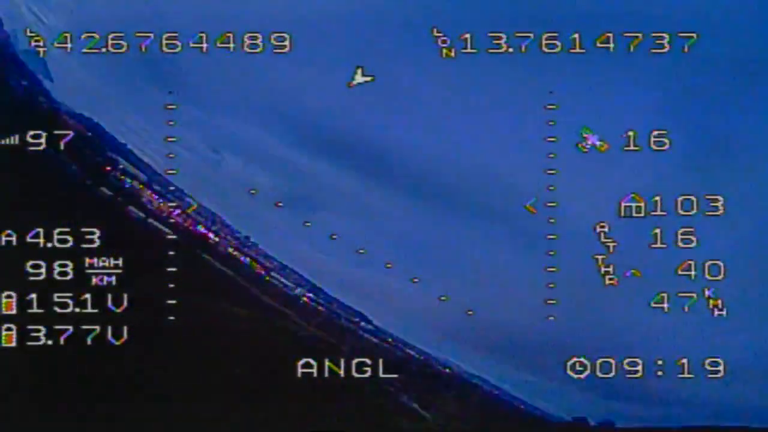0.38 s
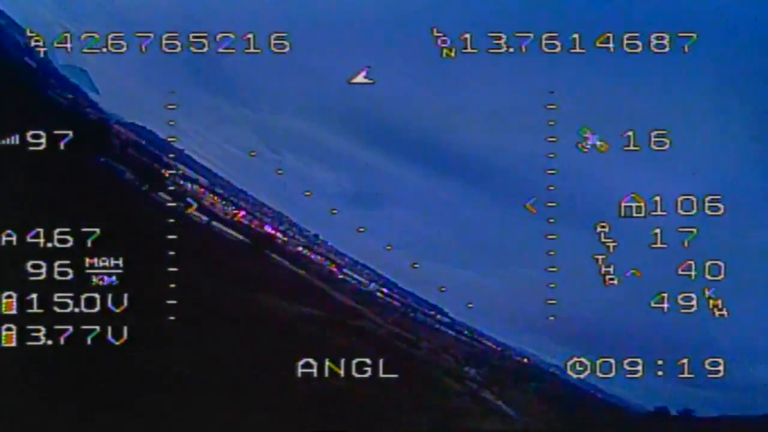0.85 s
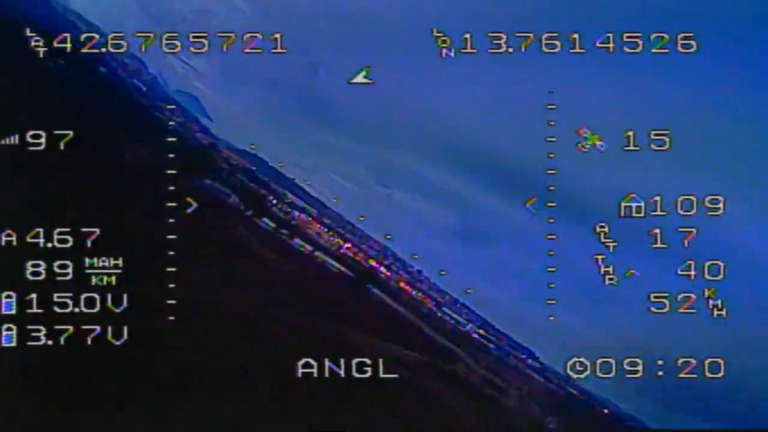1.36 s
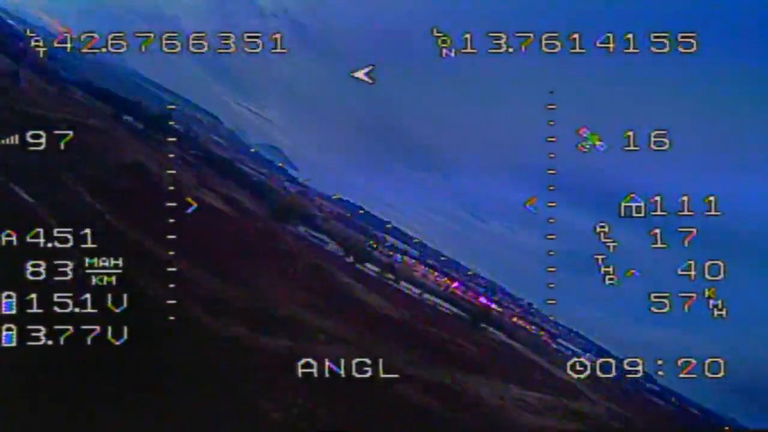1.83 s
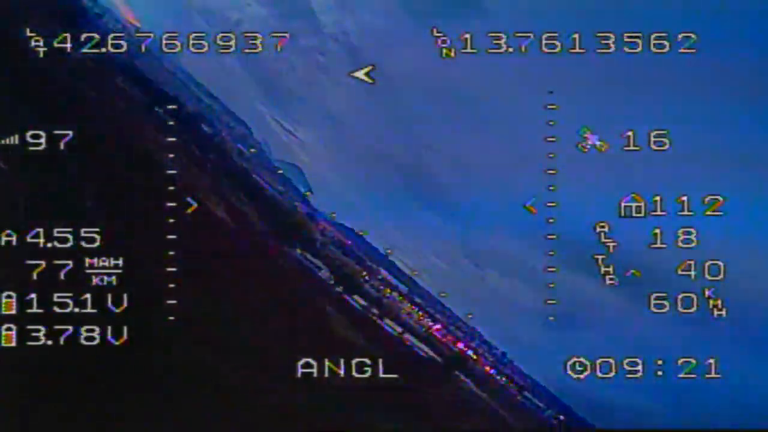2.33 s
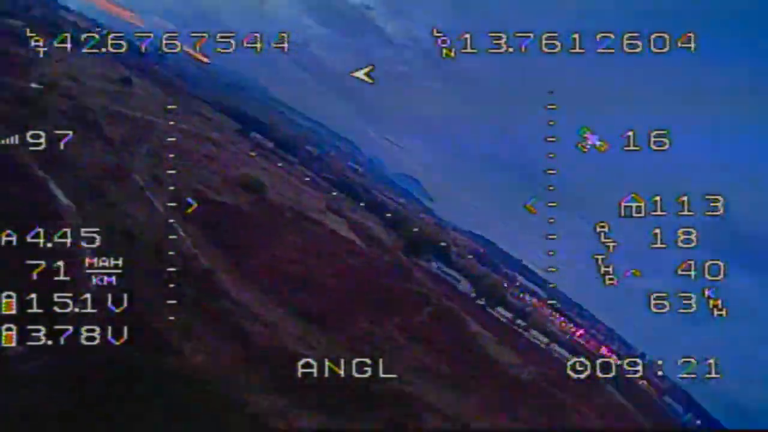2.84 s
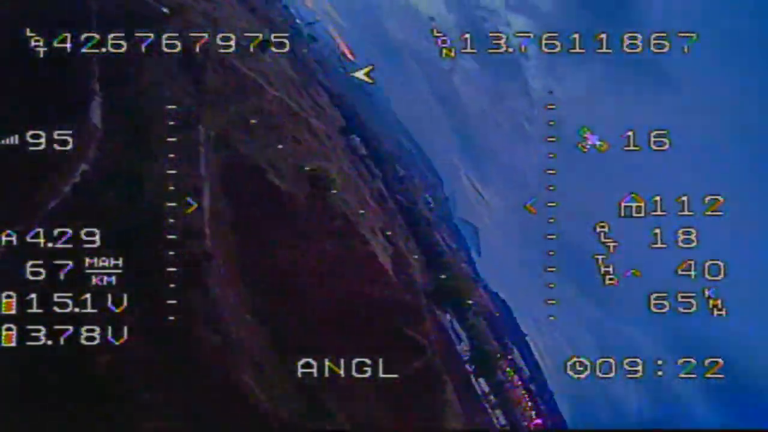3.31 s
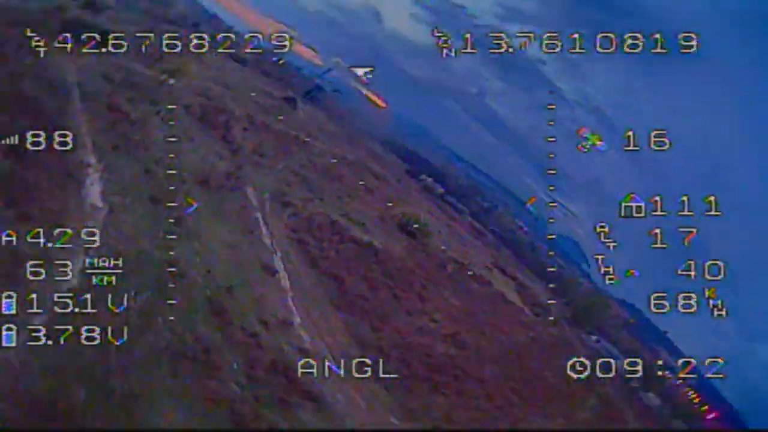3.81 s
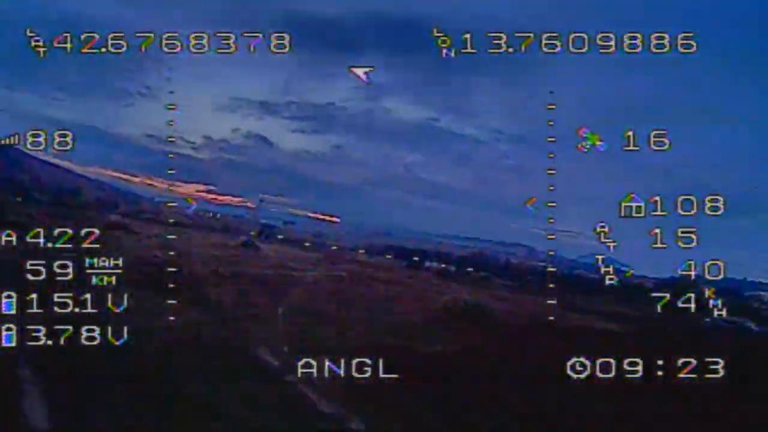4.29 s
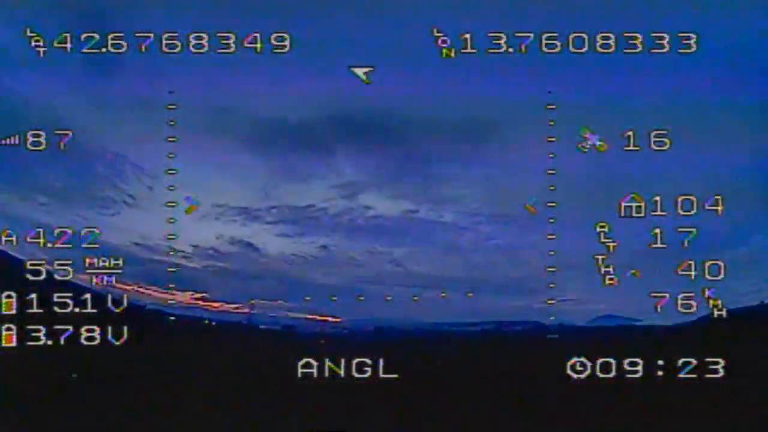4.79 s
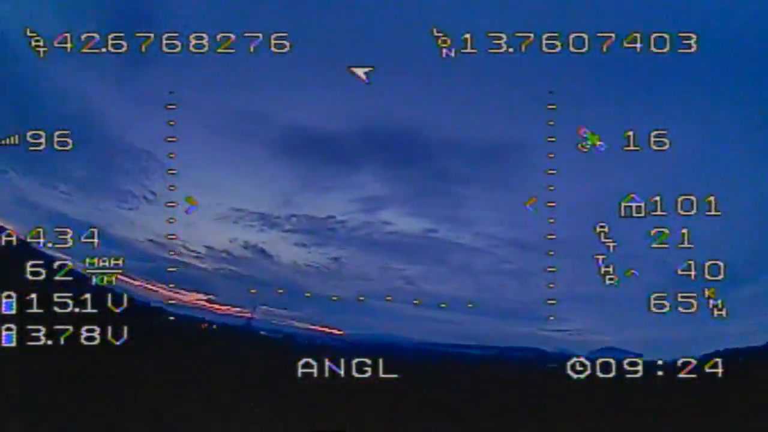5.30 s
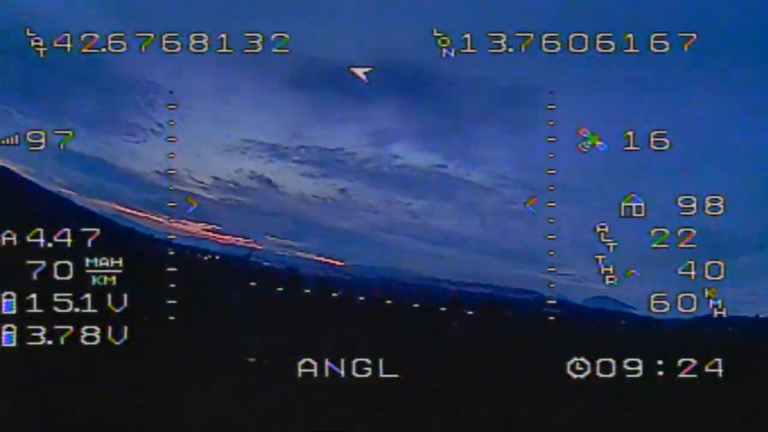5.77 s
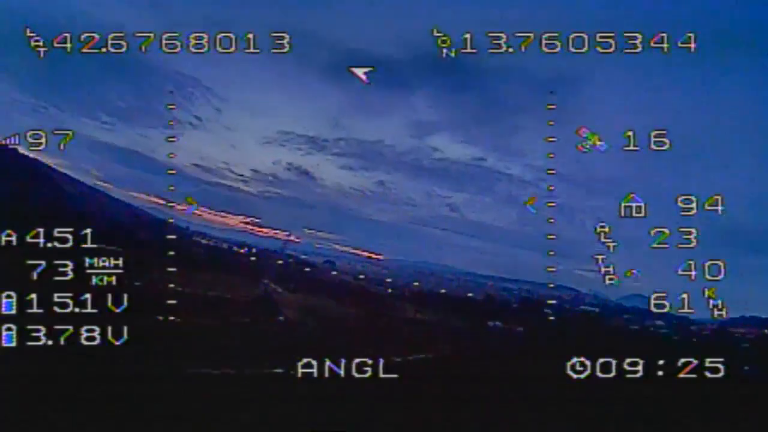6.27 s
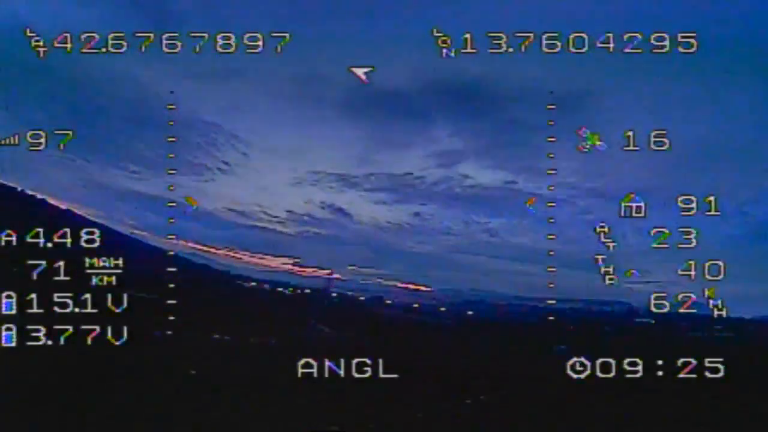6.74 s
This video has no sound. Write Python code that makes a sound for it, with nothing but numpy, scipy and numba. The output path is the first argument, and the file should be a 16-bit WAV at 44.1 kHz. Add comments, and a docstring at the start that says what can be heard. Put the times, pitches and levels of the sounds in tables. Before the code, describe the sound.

Onboard a little electric flying wing, a buzzing motor hum rises slightly and eases back amid roaring air, thin whistles and overloaded wind thumps.

```python
"""On board a small electric flying wing

A two-blade propeller hums on its shaft orders close to the microphone. Noise in overlapping ranges makes
the airstream, swelling in rough air; narrow resonances whistle, and pressure bumps overdrive the microphone.
A radio link rings near 20 Hz, hisses, crackles when reception breaks, cuts the top at 4 kHz and clips."""
import sys
import numpy as np
from scipy import signal
from scipy.fft import rfft, irfft
from scipy.io import wavfile
from scipy.ndimage import uniform_filter1d
from numba import njit

SR = 44100
rng = np.random.default_rng(int(sys.argv[2]) if len(sys.argv) > 2 else 0)


def dump(signal):
    """Clip the signal to [-1, 1] and save it as 16-bit WAV at the path in sys.argv[1]."""
    limited = np.clip(np.atleast_2d(signal).T, -1, 1)
    pcm = np.round(limited * 32767).astype(np.int16)
    wavfile.write(sys.argv[1], SR, pcm)


def level_to_linear(level):
    """Convert decibel levels to linear amplitude factors, elementwise."""
    exponent = np.asarray(level, float) / 20
    return 10 ** exponent


N = 303408  # samples
CRUISE_HZ = 168  # shaft speed that the airspeed is counted from
LINK_RING_HZ = 19.7

# Shaft speed, rising as the wing dives and the propeller unloads: (time [s], shaft speed [Hz])
SHAFT_SPEED = [(0.0, 168.2), (0.3, 167.9), (1.2, 168.2), (1.8, 170.2), (2.1, 170.2), (2.4, 171.7),
               (2.7, 171.9), (3.3, 173.5), (3.6, 173.7), (3.9, 175.5), (4.2, 175.8), (4.5, 175.5),
               (4.8, 174.1), (5.4, 170.6), (6.0, 169.6), (6.6, 169.8), (6.88, 169.5)]


def columns(table):
    """Curve columns, after the time column, as values per sample."""
    s, *cols = np.transpose(table)
    t = np.arange(N) / SR
    return [np.interp(t, s, c) for c in cols]


def unit(x):
    """Scale to rms 1."""
    return x / np.sqrt(np.mean(x ** 2))


def walk(rate):
    """Random levels held 1 / rate s and smoothed twice over that time; rms about 1."""
    hold = int(SR / rate)
    steps = np.repeat(rng.standard_normal(N // hold + 1), hold)
    slewed = uniform_filter1d(uniform_filter1d(steps, hold), hold)
    return unit(slewed)[:N]


def bump(t, middle, length):
    """Smooth rise and fall from 0 to 1 and back."""
    return np.cos(np.pi * np.clip((t - middle) / length, -.5, .5)) ** 2


@njit
def svf(x, hz, width):
    """State-variable filter with a moving centre; rows: band (gain 1), high."""
    y, b, l = np.empty((2, len(x))), 0., 0.
    for i in range(len(x)):
        g, k = np.tan(np.pi * hz[i] / SR), width / hz[i]
        v = (b + g * (x[i] - l)) / (1 + g * (g + k))
        low = l + g * v
        b, l = 2 * v - b, 2 * low - l
        y[0, i], y[1, i] = k * v, x[i] - k * v - low
    return y


def extra_speed():
    """Shaft speed above cruise in Hz: the measure of airspeed."""
    return columns(SHAFT_SPEED)[0] - CRUISE_HZ


def propeller():
    """Tones on the shaft orders; turbulence at the blades makes each flutter in size and timing."""
    # Main tones: (time [s], 2nd order level [dB], 4th order level [dB], 6th order level [dB])
    main_tones = [(0, -26, -24.5, -27), (.6, -22.5, -23.5, -27), (.85, -25.5, -17.5, -28),
                  (1.3, -21.5, -23, -25.5), (1.53, -22.5, -17.5, -29), (1.7, -27, -21.5, -26.5),
                  (2.1, -26, -17.5, -28), (2.5, -25, -25, -29.5), (2.9, -24, -22, -35.5),
                  (3.7, -26, -26.5, -30.5), (3.91, -22.5, -28, -22), (4.1, -22.5, -27.5, -35.5),
                  (4.65, -21.5, -25.5, -35.5), (4.95, -26.5, -24, -39), (5.1, -21.5, -18.5, -25),
                  (5.7, -31, -23, -27.5), (6.0, -26, -19.5, -27), (6.46, -24, -18, -25),
                  (6.88, -26.5, -18.5, -27.5)]
    # Higher orders: (multiple of the shaft rate, level at cruise [dB],
    # slope [dB per Hz of extra shaft speed], share of the 6th order's swings)
    upper_orders = [(8, -33, -.5, .5), (10, -35.5, -1.26, .7), (12, -37, -1.2, .3), (14, -40.5, 0, .3),
                    (16, -47, 0.4, .2), (18, -53.5, -2.3, .2), (20, -50, -0.6, .2), (21, -45.5, -0.67, .2)]
    turn = 2 * np.pi * np.cumsum(columns(SHAFT_SPEED)[0]) / SR
    second, fourth, sixth = columns(main_tones)
    shaft_tone_db = -28.5 + 1.1 * walk(6)
    orders = [(1, shaft_tone_db), (2, second), (4, fourth), (6, sixth)]
    sixth_swing = sixth - sixth.mean()
    for order, cruise_db, slope, share in upper_orders:
        db = cruise_db + slope * extra_speed() + share * sixth_swing + 1.2 * walk(5)
        orders.append((round(order), db))
    out = 0
    for order, db in orders:
        jitter = (0.087 + .03 * order) * walk(30)  # radians
        phase = order * turn + 2 * np.pi * rng.random() + jitter
        out = out + np.sqrt(2) * level_to_linear(db + 1.2 * walk(25)) * np.sin(phase)
    return out


def airstream():
    """Coloured turbulence in overlapping ranges that follow airspeed, each swelling and flickering a little."""
    # Relative colour of the air noise: (frequency [Hz], spectral density [dB])
    air_colour = [(21, -29.5), (35, -5.5), (101, -7), (170, -6.5), (225, -5.5), (342, -4), (386, -5),
                  (553, -5), (689, -6.5), (809, -6.5), (1010, -8), (3480, -17.5), (4170, -40),
                  (5420, -57.5), (9170, -120)]
    # Middles of the overlapping ranges, lowest first: (frequency [Hz], ..)
    centres_hz = (70, 300, 900, 1900, 3300)
    # The same ranges: (level at cruise [dB], slope [dB per Hz of extra shaft speed], slow swell [dB])
    air_ranges = [(-30, 0.68, 2), (-26.5, 0.57, 1.5), (-24.5, 0.34, 1.2), (-32, 1.09, 0), (-36.5, 0.71, .5)]
    octave = np.log2(np.maximum(np.arange(N // 2 + 1) * SR / N, 1))
    hz, db = np.transpose(air_colour)
    colour = level_to_linear(np.interp(octave, np.log2(hz), db))
    out = 0
    for share, (cruise_db, slope, swell_db) in zip(np.eye(len(centres_hz)), air_ranges):
        # each range fades into its neighbours so that their powers add up
        shape = colour * np.sqrt(np.interp(octave, np.log2(centres_hz), share))
        level_db = cruise_db + slope * extra_speed() + swell_db * walk(4)
        flicker_db = 1.2 * walk(12)
        noise = unit(irfft(rfft(rng.standard_normal(N)) * shape, N))
        out = out + level_to_linear(level_db + flicker_db) * noise
    return out


def whistle(table, width):
    """Noise through two equal narrow resonances whose pitch and level follow a table."""
    hz, db = columns(table)
    once = svf(rng.standard_normal(N), hz, width)[0]
    return unit(svf(once, hz, width)[0]) * level_to_linear(db)


def whistles():
    """Edge tones of air over an opening, wandering with airspeed and angle."""
    # Middle edge tone: (time [s], pitch [Hz], level [dB])
    middle = [(0, 1243, -27), (.45, 1280, -29.5), (.8, 1283, -31), (1.3, 1312, -27), (1.62, 1442, -28.5),
              (1.72, 1307, -37), (1.82, 1136, -21.5), (1.95, 1200, -27.5), (2.3, 1212, -27),
              (2.5, 1254, -52.5), (2.78, 1273, -21), (2.97, 1335, -24), (3.15, 1465, -41.5),
              (3.8, 1433, -36), (3.95, 1455, -25), (4.55, 1438, -27), (4.95, 1378, -23), (5.4, 1205, -31),
              (5.6, 1228, -45), (6.15, 1418, -47), (6.3, 1478, -28), (6.88, 1457, -28)]
    # Lower edge tone: (time [s], pitch [Hz], level [dB])
    lower = [(0, 596, -27.5), (.4, 615, -28.5), (.9, 610, -30), (1.45, 636, -31), (1.65, 633, -47.5),
             (3.9, 961, -40), (4.15, 985, -27.5), (4.8, 888, -28.5), (5.0, 870, -41), (6.15, 1123, -43),
             (6.3, 1105, -26.5), (6.88, 1119, -28)]
    # Higher edge tone: (time [s], pitch [Hz], level [dB])
    higher = [(2.7, 1595, -57.5), (2.85, 1647, -33), (3.02, 1827, -29), (3.12, 1820, -51),
              (3.75, 1755, -44.5), (3.9, 1770, -27), (4.3, 2057, -32), (4.75, 1875, -38), (5.05, 1726, -24),
              (5.2, 1672, -52.5)]
    return whistle(middle, 85.) + whistle(lower, 65.) + whistle(higher, 140.)  # widths in Hz


def port_hiss():
    """Air over the microphone port rings in a steady high band, its level following airspeed."""
    centre_hz, width_hz, cruise_db = 3660., 380, -42
    ringing = svf(rng.standard_normal(N), np.full(N, centre_hz), width_hz)[0]
    return unit(ringing) * level_to_linear(cruise_db + 0.22 * extra_speed())


def sway():
    """Slow pressure swings as the wing rocks in rough air, now and then in stronger bouts."""
    # Harder rocking, centred a quarter length before the time at which its
    # sine crosses zero: (zero crossing [s], whole length [s], peak level [dB])
    rocking = [(.43, .35, -30), (1.29, .2, -33), (1.84, .15, -28), (2.185, .15, -25.5), (2.395, .15, -29),
               (2.962, .26, -23.5), (3.495, .2, -28), (3.805, .25, -29), (4.28, .2, -29), (5.919, .25, -30),
               (6.57, .15, -32)]
    t = np.arange(N) / SR
    hz, width_hz, sway_db = np.full(N, 20.), 9.9, -39.5
    once = svf(rng.standard_normal(N), hz, width_hz)[0]
    out = unit(svf(once, hz, width_hz)[0]) * level_to_linear(sway_db)
    for s, length, db in rocking:
        swing = np.sin(2 * np.pi * LINK_RING_HZ * (t - s))
        out = out + level_to_linear(db) * bump(t, s - length / 4, length) * swing
    return out


def rough_air():
    """Bursts of turbulence, each a swell of noise in its own range."""
    # Bursts, level before the treble is smoothed:
    # (middle [s], length [s], centre [Hz], width [Hz], level [dB])
    bursts = [(1.722, 0.27, 495, 900, -19), (2.28, 0.26, 594, 900, -18), (2.535, 0.43, 203, 220, -14),
              (2.948, .4, 806, 1200, -22.5), (3.198, 0.56, 303, 400, -22), (3.52, 0.17, 702, 900, -19),
              (3.76, 0.23, 512, 900, -20), (4.3, .5, 90, 100, -25.5), (4.65, .35, 500, 700, -22.5),
              (5.304, 0.53, 510, 600, -16.5), (5.748, 0.25, 200, 400, -9), (6.0, 0.83, 349, 400, -20),
              (6.88, 0.16, 69.7, 80, -23)]
    out, t = 0, np.arange(N) / SR
    for s, length, hz, width, db in bursts:
        noise = unit(svf(rng.standard_normal(N), np.full(N, 1. * hz), 1. * width)[0])
        smoothed = uniform_filter1d(noise, size=int(SR / hz / 5))  # a fifth of a period
        out = out + level_to_linear(db) * bump(t, s, length) * smoothed
    return out


def reception_breaks():
    """The receiver output jumps while the carrier is lost, then swings back and settles."""
    # Breaks, sizes ahead of the top cut and the rails:
    # (start [s], length [s], jump [amplitude], swing back [amplitude])
    breaks = [(3.5788, 0.0032, 1.3, -0.6), (3.5826, 0.0005, 2.2, -0.4), (3.6101, 0.0013, 1.1, -0.3),
              (3.6128, 0.0013, 1.5, -0.7), (3.7072, .0007, -1.0, .05), (4.8262, 0.0028, 1.1, .05),
              (5.8222, .0004, .4, 0)]
    settle_s = 0.0059
    t, out = np.arange(N) / SR, np.zeros(N)
    for s, length, jump, back in breaks:
        after = t - s - length
        out += jump * ((t >= s) & (after < 0))
        out += back * (after >= 0) * np.exp(-np.maximum(after, 0) / settle_s)
    return out


def gusts():
    """Smooth pressure bumps on the membrane, strong enough to overdrive the microphone."""
    # Gusts: (middle [s], length [s], push ahead of the overdrive [amplitude, sign = direction])
    pushes = [(5.690, 0.018, 0.3), (5.743, 0.012, -0.4), (5.767, 0.012, -.5), (5.810, 0.03, -.65)]
    t = np.arange(N) / SR
    return sum(push * bump(t, s, length) for s, length, push in pushes)


def scene():
    """Everything that presses on the microphone; source levels are those ahead of its overdrive."""
    air = airstream() + rough_air() + port_hiss() + sway() + whistles() + gusts()
    return (propeller() + air)[None]


def low_pass(x):
    """Removes everything above the highest recorded frequency."""
    return signal.sosfilt(signal.butter(12, 15800, fs=SR, output="sos"), x)


def record(dry):
    """Overdriven microphone, ringing bass coupling, radio link, steep top cut, hard rails."""
    ring_width_hz, hiss_db, top_hz = 3., -29.5, 4100  # hiss level ahead of the top cut
    offset, rail = 0.013, .705
    mic = 0.4 * np.tanh(4.13 * dry[0])
    coupled = svf(mic, np.full(N, LINK_RING_HZ), ring_width_hz)[1]  # high-pass that rings at its corner
    hiss = level_to_linear(hiss_db) * rng.standard_normal(N)
    top_cut = signal.cheby1(12, .5, top_hz, fs=SR, output="sos")
    line = signal.sosfilt(top_cut, coupled + hiss + reception_breaks()) + offset
    clipped = np.clip(line, -rail, rail)
    return low_pass(clipped[None])


dry = scene()
out = record(dry)
dump(out)
```